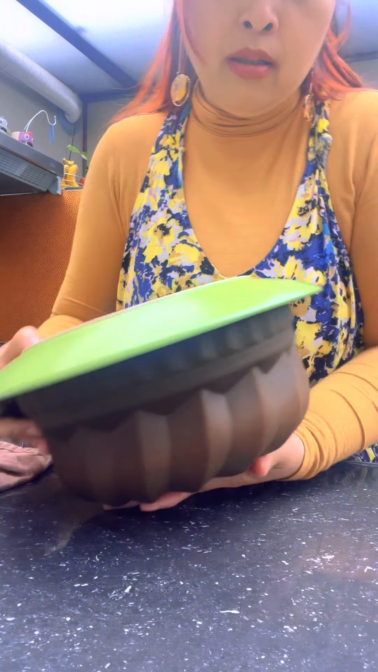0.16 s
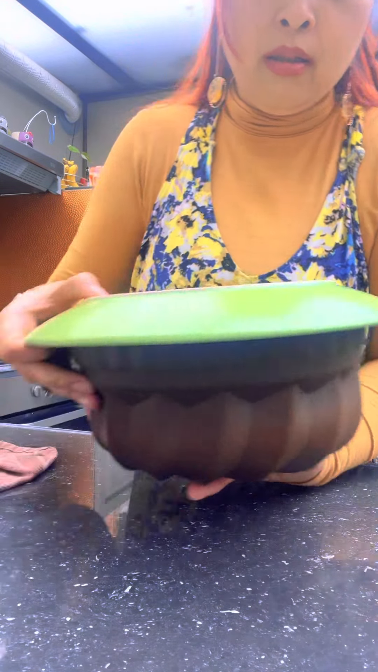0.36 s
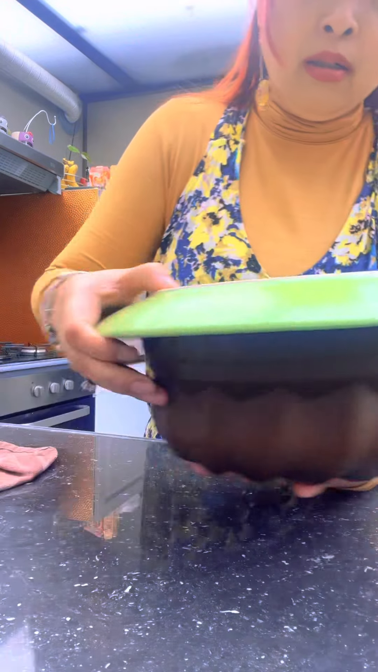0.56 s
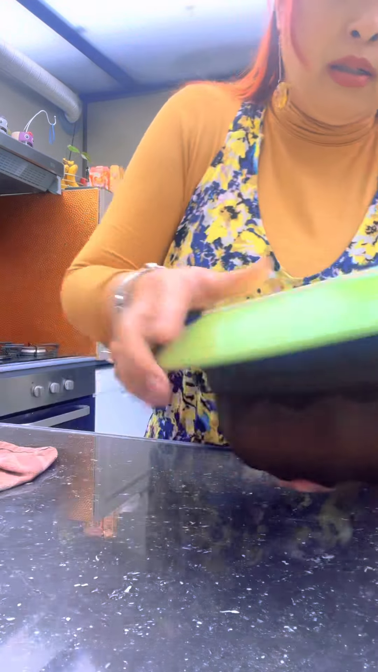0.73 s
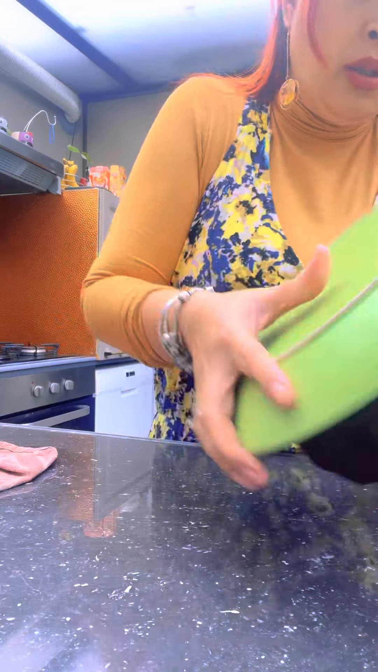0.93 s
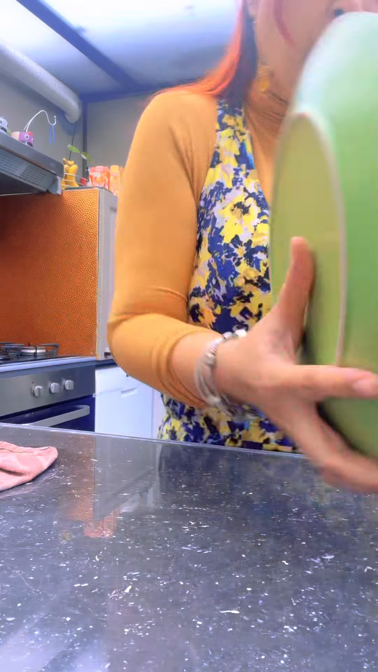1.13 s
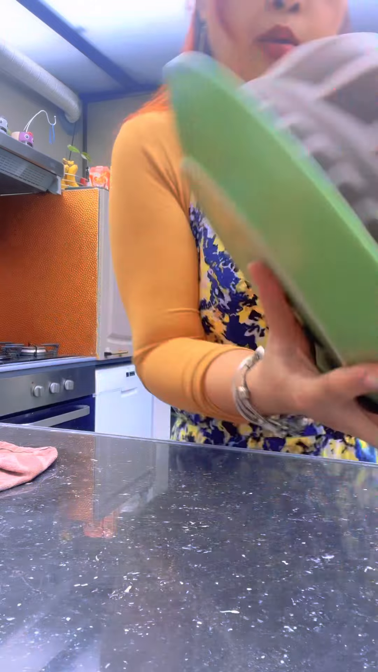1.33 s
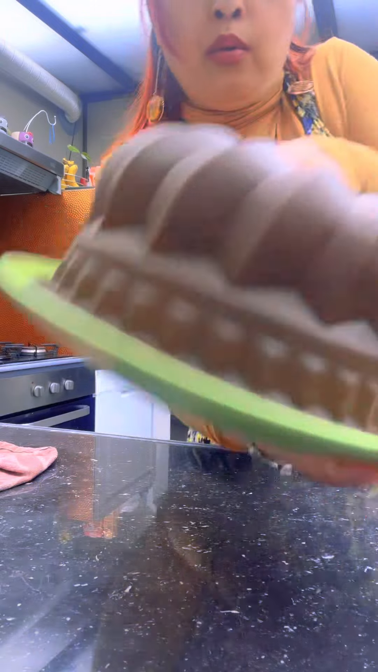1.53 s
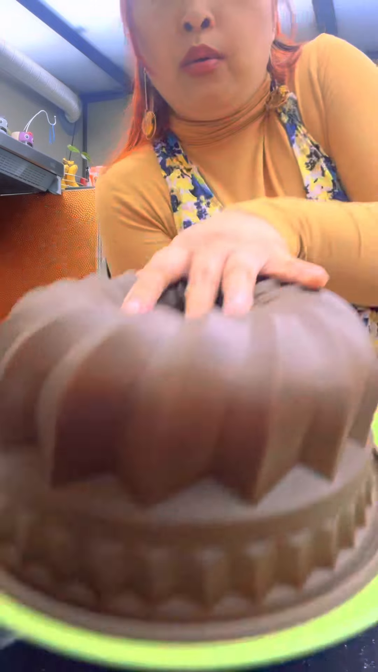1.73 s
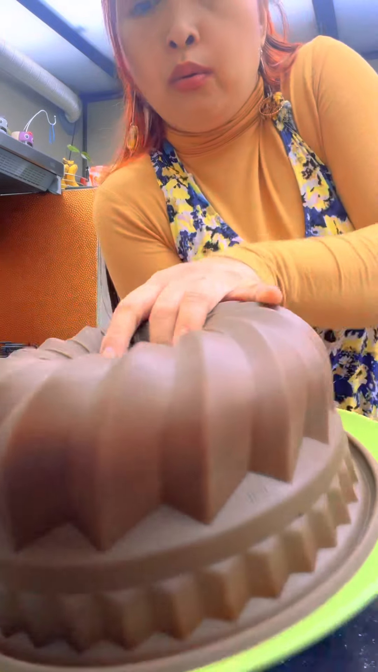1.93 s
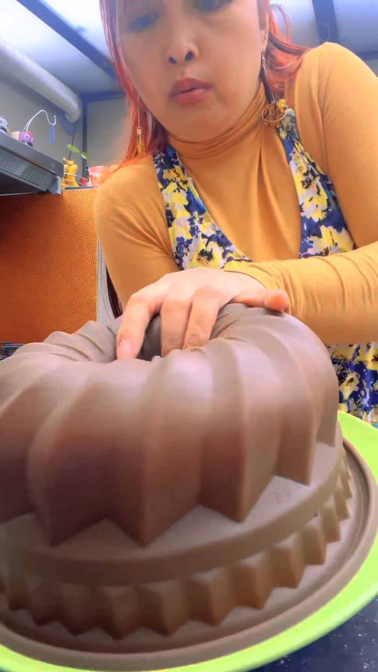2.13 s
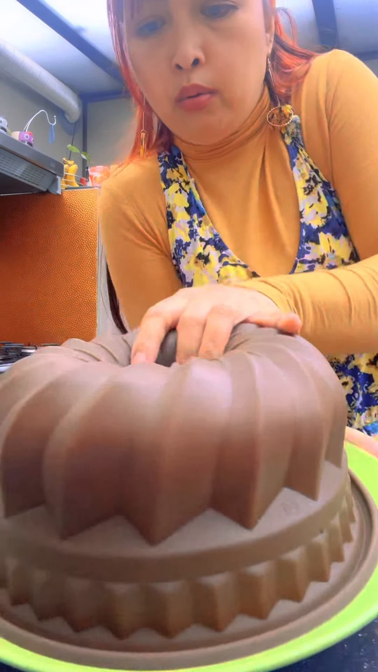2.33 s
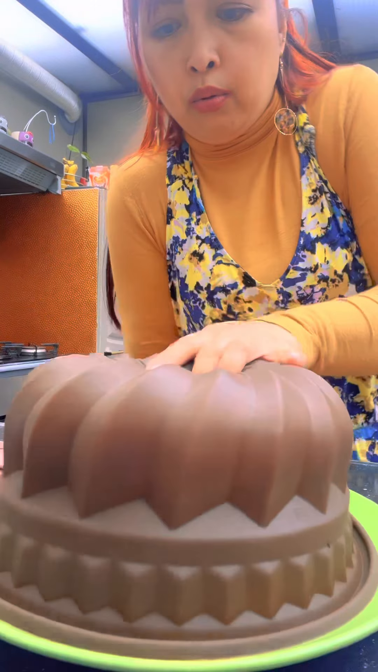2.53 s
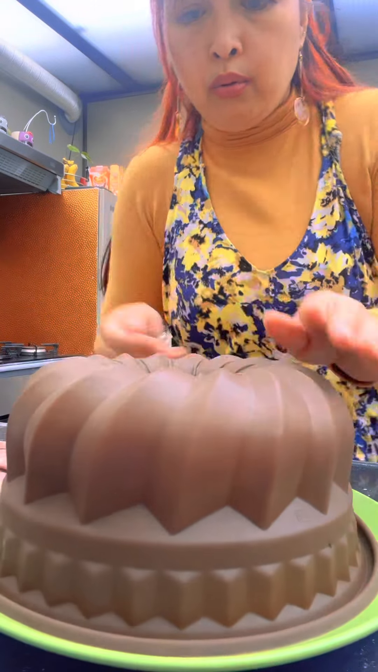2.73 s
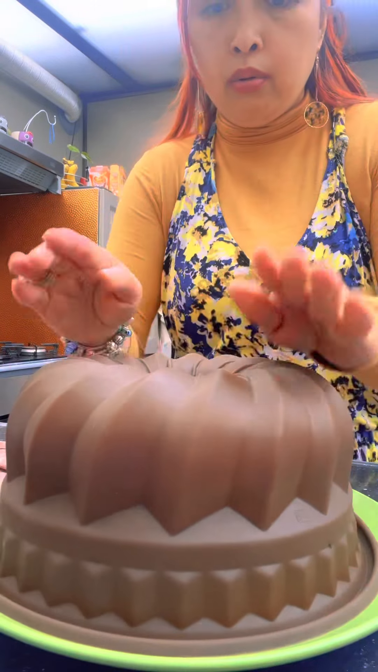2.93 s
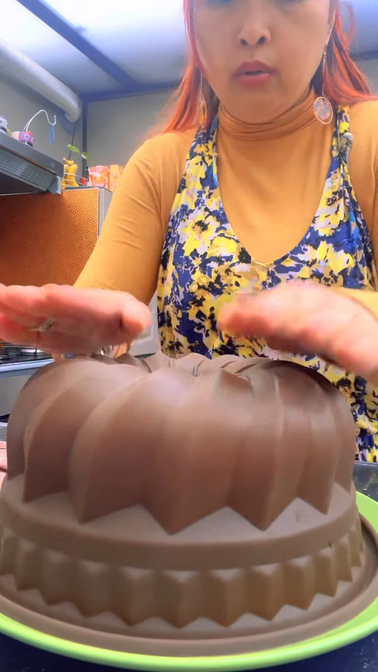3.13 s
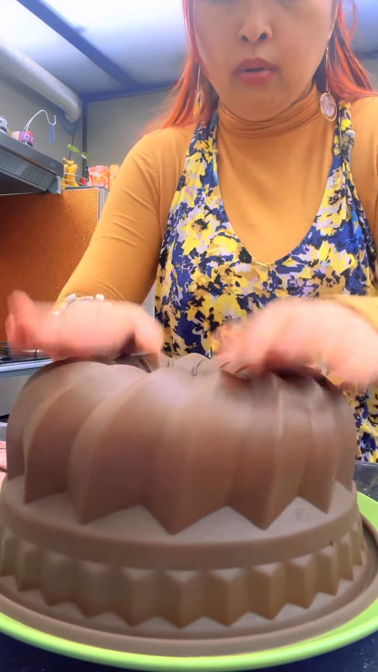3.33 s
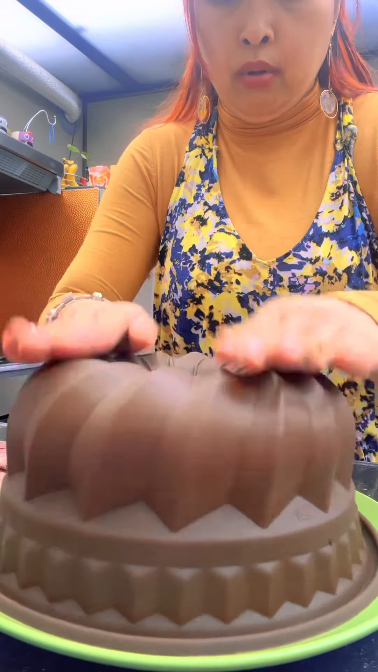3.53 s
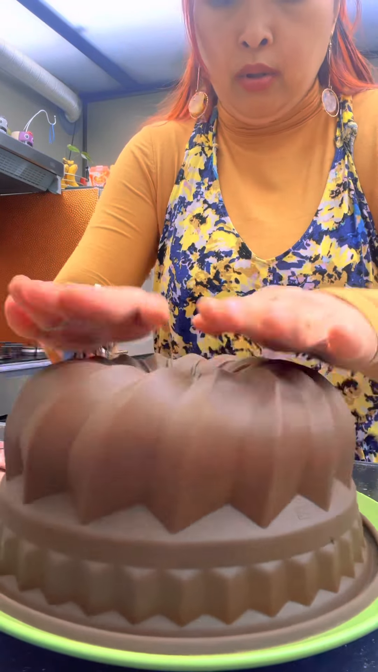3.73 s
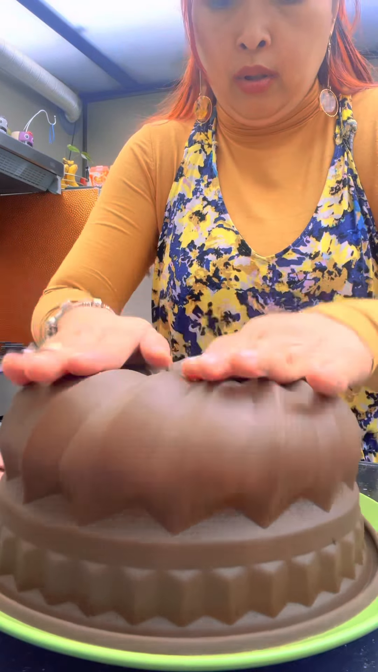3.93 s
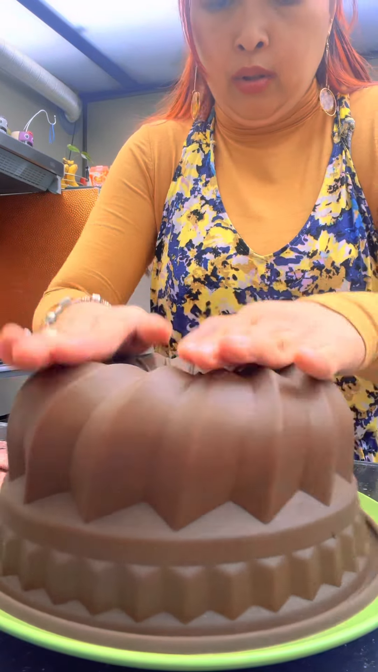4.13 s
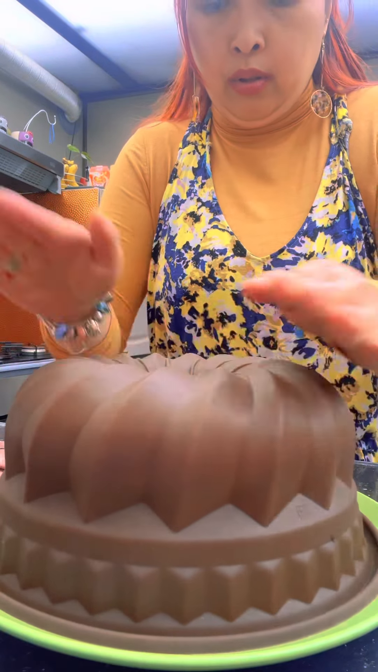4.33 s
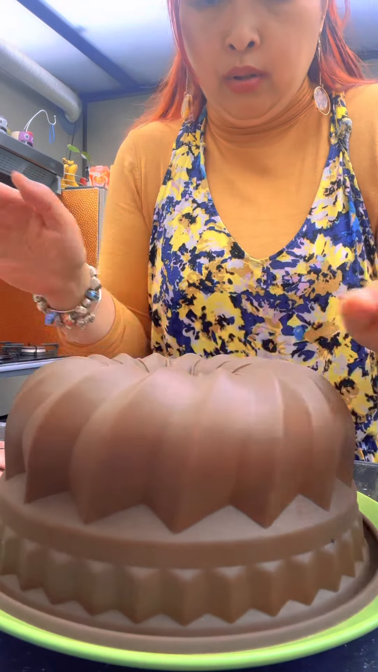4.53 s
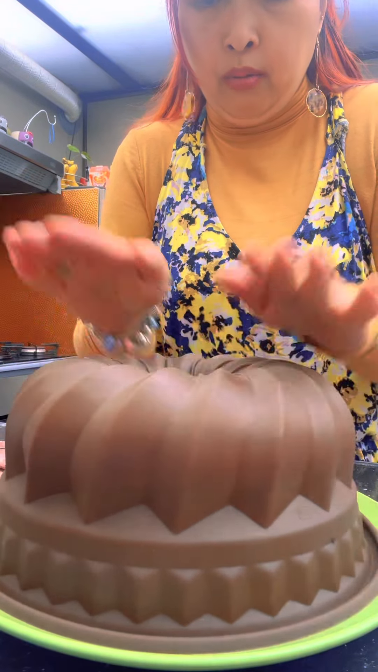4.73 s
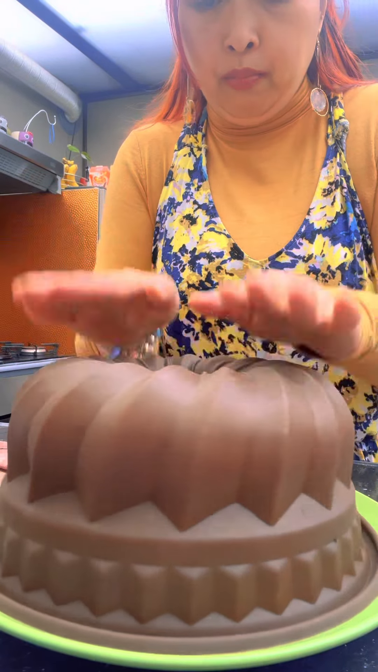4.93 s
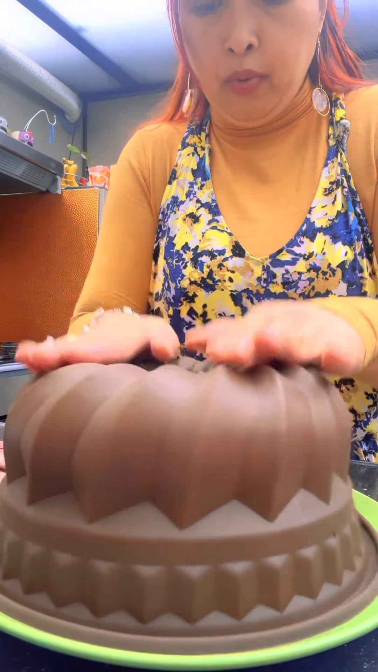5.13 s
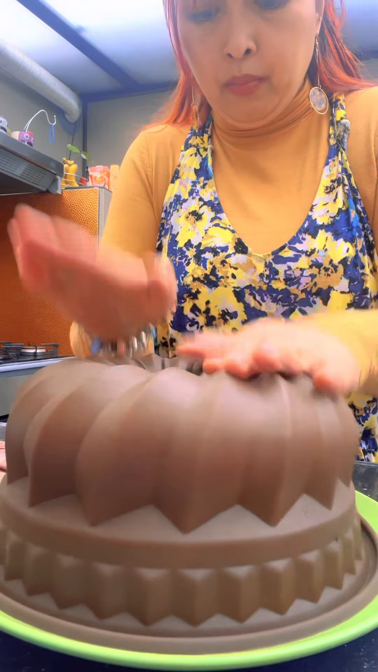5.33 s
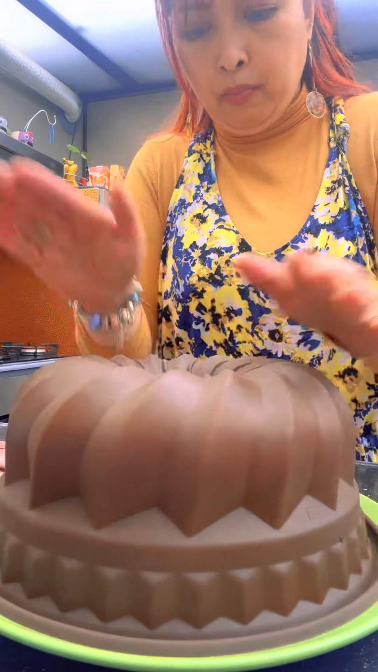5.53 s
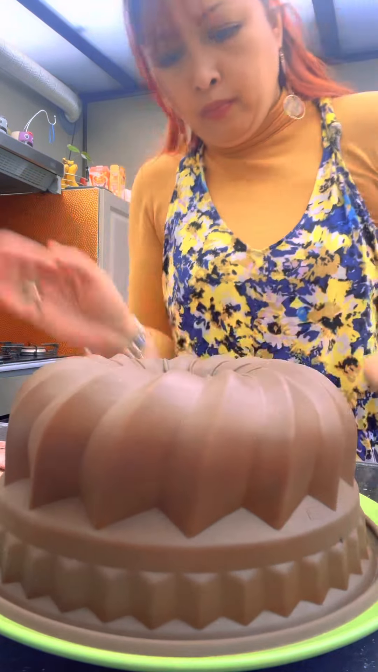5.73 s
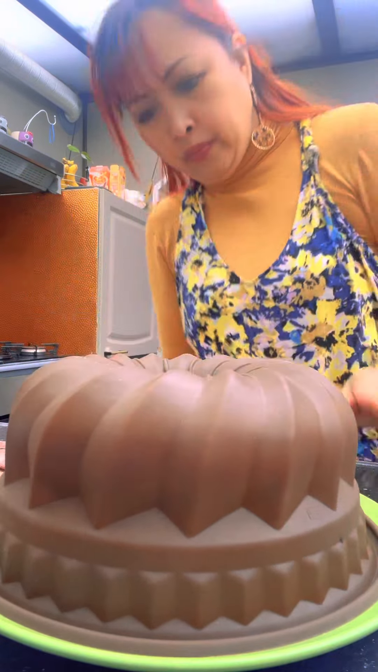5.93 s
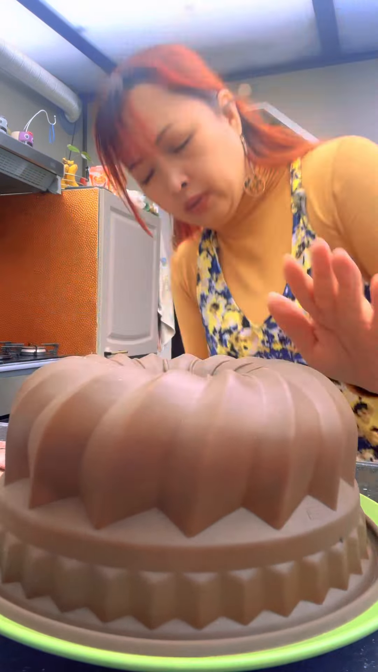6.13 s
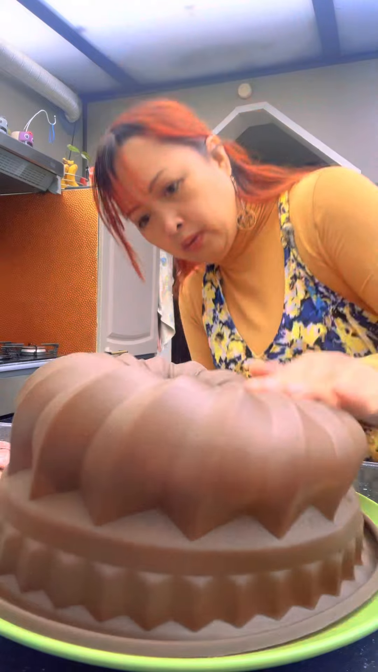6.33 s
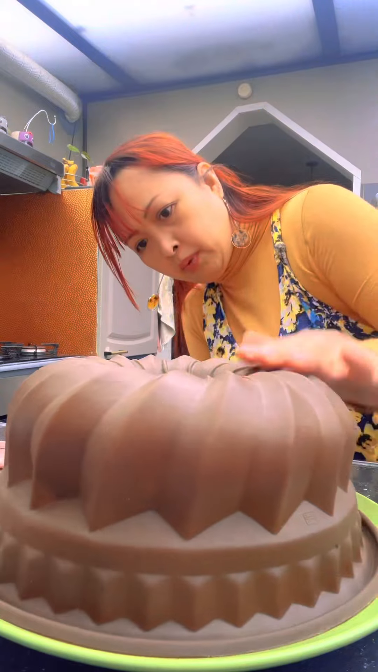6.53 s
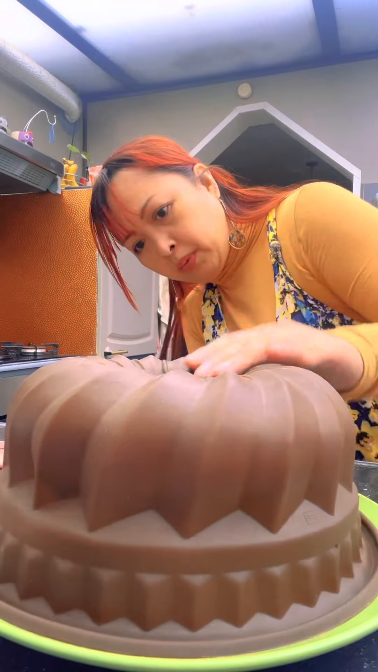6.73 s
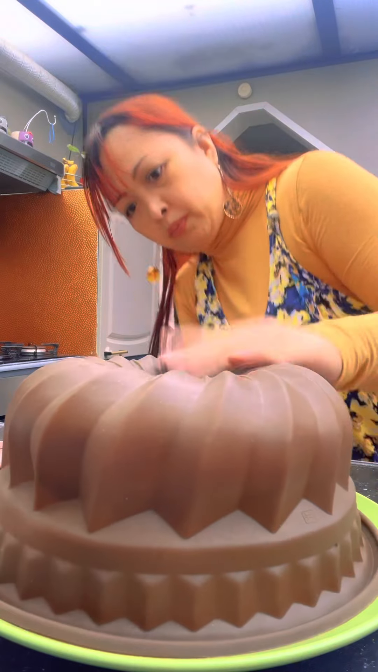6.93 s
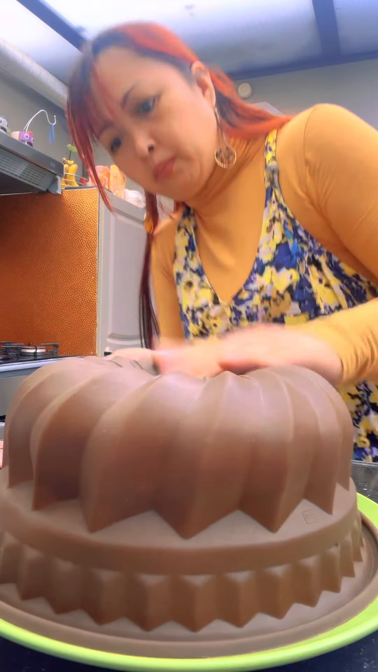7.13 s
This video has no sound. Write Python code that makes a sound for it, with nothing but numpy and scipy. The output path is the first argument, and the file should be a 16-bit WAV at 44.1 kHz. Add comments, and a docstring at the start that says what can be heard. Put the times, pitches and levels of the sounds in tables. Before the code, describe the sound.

Plate and pan bang down on stone, squeak and knock flat, followed by bursts of soft hollow hand pats with small bead ticks over a low hum.

```python
"""A cake pan on a plate is turned over onto a stone counter in a quiet kitchen, heard at two close ports.
First faint plate squeaks and bead ticks (noise grit through modes, short noise bursts); then the rim bounces
and slams (noise knocks into plate modes, falling thumps), slides squealing and juddering, and slams again.
Then palms drum on the soft pan (falling thumps, pushes into damped modes, slaps) while beads tick and rustle.
Throughout, a wavering hum (coloured noise) lies beneath and the room answers with a sparse decaying tail."""
import sys
import numpy as np
from scipy import signal
from scipy.fft import rfft, irfft, next_fast_len
from scipy.io import wavfile
from scipy.ndimage import uniform_filter1d

SR = 44100
rng = np.random.default_rng(int(sys.argv[2]) if len(sys.argv) > 2 else 0)


def to_wav(sig):
    """Store sig (one row per channel, or 1-D mono) as 16-bit WAV at the path in sys.argv[1].

    Samples outside -1..1 are clipped; the rate is SR.
    """
    pcm = np.clip(np.atleast_2d(sig), -1, 1) * 32767
    pcm = np.round(pcm).astype(np.int16)
    wavfile.write(sys.argv[1], SR, pcm.T)  # frames by channels


N = 320330  # samples
T = np.arange(N) / SR  # s
PAD = next_fast_len(N + 8192)  # transform length, samples

# Levels are drives, ahead of the filters and the mix; "rel" is relative to the first level of the row.
# rim of the plate touching the stone: [t/s, level/dB, free ring rel/dB]
RIM_BOUNCES = [(1.7636, -7.5, -6), (1.772, -25.5, -10), (1.778, -10.5, -14), (1.7865, -19.5, -10.5),
               (1.795, -17.5, -13.5), (2.305, -21.5, 12.5)]
# plate rolling down flat: [t of landing/s, level/dB, roll time/s, thump/dB, climb over the roll/dB,
# ring of plate and pan rel/dB, closing crack rel/dB, share leaning left]
PLATE_SLAMS = [(1.827, -14, .02, -12, 15.5, 1.5, -10, .9), (2.487, -15, 0.015, -4, 10, -21.5, -5.5, .2)]
# noise spectrum of a slam: [f/Hz, level per Hz/dB]
SLAM_SPECTRUM = [(60, -40), (150, -14), (450, -3), (900, -0.5), (1500, 0.5), (2400, -3.5), (3300, -13.5),
                 (4100, -10.5), (5000, -31.5), (6400, -14), (9000, -40.5), (13500, -41.5), (16400, -46)]
# plate alone: [f/Hz, width/Hz, level/dB]
PLATE_MODES = [(651, 32, 5), (1302, 34, -1), (1434, 35, -7.5), (2060, 6.8, -6), (2287, 18, -2.5),
               (3064, 30, -3), (4048, 94, -2), (5090, 17, -7), (6180, 85, -13), (13900, 180, -23.5),
               (15000, 110, -31)]
# plate and pan together: [f/Hz, width/Hz, level/dB]
LOADED_MODES = [(535, 26, 0), (712, 60, -1.5), (800, 29, -8), (907, 65, 7.5), (1120, 33, -10),
                (1310, 280, -1), (1777, 92, -0.5)]
# rim struck on stone: [f/Hz, width/Hz, level/dB]
RIM_MODES = [(1620, 260, 9.5), (1920, 220, 6.5), (3400, 260, 7), (5694, 320, 5.5), (6600, 230, 1),
             (12330, 3000, -12.5)]
# further modes of the plate in scrapes, bounces and cracks: [f/Hz, width/Hz, level/dB]
STONE_CONTACT_MODES = [(3154, 120, -7), (3590, 73, -10.5), (3800, 84, -4), (4000, 66, -2.5),
                       (4490, 56, -4.5), (5030, 130, -1.5), (6405, 250, -7)]
# thin lingering tones after a knock: [f/Hz, width/Hz, level/dB]
LINGER_MODES = [(2110, 12, -3), (3365, 12, 0), (5066, 10, -6)]
# their single swell: [t of peak/s, level/dB, rise/s, fall/s]
LINGER_ENVELOPE = (1.842, -47, .008, .2)
# plate squeaking against pan or stone: [t of peak/s, level/dB, low modes rel/dB, rise/s, fall/s]
PLATE_SQUEAKS = [(0.584, -65, 3.5, 0.34, 0.17), (0.8, -64, 1, 0.086, 0.092), (1.36, -55, 8, 0.055, 0.076),
                 (1.408, -57, 2, 0.013, 0.016), (1.547, -66, 5, 0.042, 0.11),
                 (2.241, -65.5, -0.5, 0.17, .1), (2.528, -61, 10.5, .05, 0.091)]
# plate scraping along the stone: [t/s, level/dB, low modes rel/dB]
STONE_SCRAPE = [(2.303, -40.5, 4.5), (2.307, -25, 4.5), (2.335, -32.5, -20), (2.37, -30, -30),
                (2.42, -23, -30.5), (2.432, -38, -15), (2.459, -41.5, -1.5), (2.47, -40, 21)]
# thin tones while fingers creep over the plate: [f/Hz, width/Hz, level/dB]
CREEP_MODES = [(1180, 26, -2), (1817, 26, -6.5), (2360, 20, -6)]
# strength of the creeping: [t/s, level/dB]
CREEP_LEVEL = [(0.502, -71), (.62, -72), (1.12, -64.5), (1.22, -70)]
# rim squealing while it scrapes: [t/s, level/dB, centre f/Hz]
RIM_SQUEAL = [(2.307, -28.5, 3920), (2.333, -19, 3850), (2.35, -25.5, 3780), (2.418, -22, 4140),
              (2.432, -43.5, 3670)]
# low hum while the plate judders along: [t/s, f/Hz, level/dB]
PLATE_JUDDER = [(2.273, 167, -42), (2.284, 180, -39.5), (2.312, 241, -41), (2.323, 211, -37),
                (2.402, 184.6, -41), (2.471, 185, -38)]
# short ringing notes amid the knocks and pats, one row a note: [t/s, level/dB, f/Hz, t60/s]
RINGING_NOTES = [(3.403, -16.5, 1270, 0.018), (2.305, -19, 5100, 0.051), (2.305, -23.5, 6210, 0.043),
                 (3.853, -32, 1284, 0.03), (3.866, -26.5, 1310, 0.029), (3.921, -36, 2170, 0.11),
                 (3.983, -34.5, 5090, 0.064), (4.083, -33, 3723, 0.034), (4.813, -22, 548.5, 0.21),
                 (4.872, -33.5, 695, 0.12), (5.089, -28, 612, 0.044), (5.364, -22, 2620, 0.039),
                 (6.545, -18, 702, 0.021), (6.559, -21.5, 473, 0.044), (6.733, -46, 597, 0.16),
                 (7.013, -38.5, 485, 0.3)]
# palms and fingers landing on the pan: [t/s, level/dB, settled f/Hz, slap rel/dB, lean to the left/dB]
HAND_PATS = [(0.57, -37.5, 290, -28, 14), (2.175, -36, 240, -7, 12), (2.273, -37, 386.4, -20.5, 0),
             (2.549, -26.5, 225.6, -5, 8), (2.678, -46, 184, -1, 5), (2.798, -42, 226, -5.5, 16),
             (2.853, -49.5, 177.3, -22, -4), (2.913, -44, 237, -5, 16.5), (3.01, -34.5, 166, -23.5, -5),
             (3.035, -25.5, 199.6, -17.5, 15), (3.061, -29.5, 117, -12, 16), (3.118, -35.5, 161, -14, -13),
             (3.19, -30.5, 113.2, -15, 5), (3.24, -33.5, 233, -13.5, 7), (3.332, -25.5, 156, -22, 4),
             (3.358, -26.5, 211, -20, -9), (3.399, -22.5, 106, -6, 9), (3.473, -20.5, 207, -22.5, -5),
             (3.527, -25.5, 136, -22, 5), (3.548, -27.5, 200, -9, -3), (3.612, -22.5, 161.5, -23, -7),
             (3.667, -27.5, 188, -12, -2), (3.774, -24.5, 122, -36, -12), (3.838, -25, 298, -13, 2),
             (3.853, -21, 187, -10, 17), (3.924, -19, 161, -19, 4), (3.955, -25, 172, -21, 2),
             (3.983, -17.5, 280, -9.5, 5), (4.059, -18.5, 158, -16.5, -6), (4.102, -14, 250.5, -40, -9),
             (4.141, -20.5, 243, -15.5, -6), (4.789, -21, 430, -6.5, 0), (4.795, -10, 192, -20, -9.5),
             (4.814, -17, 251, -26, -6), (4.838, -26, 109, -14, -1), (4.861, -12.5, 208, -15.5, 7),
             (4.925, -25.5, 170, -31, -4), (4.981, -26.5, 196, -2, 21), (5.04, -30.5, 158, -24, 20),
             (5.086, -15.5, 194, -21, -3), (5.121, -18, 143, -21, -3.0), (5.153, -19, 187, -22, 4),
             (5.197, -23.5, 218.3, -18, -3), (5.218, -34, 272, -6, 1), (5.293, -24, 309, -7.5, 19),
             (5.321, -19.5, 274, -8.5, -3), (5.356, -14, 177, -16, -5), (5.412, -18.5, 185, -14, -5),
             (5.443, -22, 149, -2.5, 24), (5.486, -22, 152, -4.5, 9), (5.542, -30, 225, -29.5, 6),
             (5.921, -27, 263, -11, 18), (6.245, -16.5, 192, -9.5, -3), (6.275, -21, 151, -14, -6),
             (6.341, -23.5, 226, -6, 0), (6.36, -15.5, 211.5, -9.5, 15), (6.38, -12.5, 270, -10.5, 1),
             (6.41, -26, 230, -42, -21), (6.484, -25, 170.5, -10, 5.5), (6.543, -18, 419, -12, -2),
             (6.686, -22, 177.7, -13, 15), (6.718, -32, 104, -25.5, -12), (6.784, -23, 236.6, -3.5, 6),
             (6.848, -31, 188.7, -35.5, 4), (6.894, -27, 230, -6, 20), (6.949, -22.5, 222, -13.5, 1),
             (6.961, -23.5, 209, -11.5, 1.5), (7.012, -29.5, 248, -39, -12), (7.046, -22, 161, -1.5, 13),
             (7.109, -31, 142, -17, 6), (7.152, -17.5, 189.3, -14.5, 6), (7.182, -35, 117, -12, 6),
             (7.254, -22.5, 360, 1.5, 13)]
# skin slapping the pan: [f/Hz, level per Hz/dB]
SLAP_SPECTRUM = [(150, -6), (400, 3), (700, -7.5), (1200, -6), (1800, -13), (2150, -21.5), (2500, -39),
                 (4000, -23), (8000, -65)]
# soft pan: [f/Hz, width/Hz, level/dB]
PAN_MODES = [(108.5, 6.5, -0.5), (136, 5.9, -9.5), (190, 16, -6), (222, 73, 2.5), (240.9, 38, -1.5),
             (311.3, 160, 0), (449, 190, -8), (604, 10, 0.5), (659, 45, -1)]
# pan wobble after each pat: [level re pat/dB, rise/s, fall/s]
PAT_WOBBLE = (-15, 0.0027, 0.13)
# counter shake after each pat: [level re pat/dB, rise/s, fall/s]
PAT_SHAKE = (-19.5, 0.0085, 0.1)
# pan creak after each pat: [level re pat/dB, rise/s, fall/s]
PAT_CREAK = (-25, 0.016, 0.06)
# pan steadied by hand after the landing: [t/s, wobble/dB, counter shake rel/dB, creak rel/dB]
HAND_STEADYING = [(1.83, -59.5, 21, 39), (1.86, -44.5, 6.5, 18), (1.95, -54.5, -7.5, 9.5),
                  (2.05, -56, -17, 11.5), (2.1, -53, -16.5, 19), (2.15, -58.5, -5.5, 18),
                  (2.24, -58, -5.5, 3.5), (2.28, -60, -1.5, 22), (2.43, -56.5, -17, -0.5),
                  (2.5, -57, 4.5, 20.5), (2.56, -54.5, -3, 19.5), (2.75, -85, -23, -7),
                  (2.96, -74, -17, -23.5)]
# how far the pats reach into the counter: [t/s, level/dB]
COUNTER_REACH = [(3, 10), (4.3, 10.5), (4.8, 3.5), (5.5, 7.5), (6.2, 4), (7.26, -6.5)]
# beads knocking together: [t/s, level/dB, brightness rel/dB, ring f/Hz]
BEAD_TICKS = [(0.862, -51.5, 14.5, 5820), (0.88, -55, 12, 5800), (1.19, -54, -6, 3070),
              (1.482, -49, -11.5, 5530), (1.619, -55, 4, 7000), (1.684, -47.5, -19, 4200),
              (2.017, -48, -30.5, 6060), (3.007, -49.5, -8, 5010), (3.0338, -48.5, -10, 3290),
              (3.1826, -42.5, -7, 5950), (3.238, -48.5, -17.5, 3380), (3.3046, -48, -15, 3860),
              (3.332, -41.5, -11, 5400), (3.385, -41, -17, 3460), (3.402, -32, -44, 2450),
              (3.473, -43.5, -3.5, 1904), (3.612, -42.5, -4.5, 5850), (3.714, -51.5, 7.5, 5960),
              (3.7743, -42, -9, 6300), (3.798, -46.5, -6.5, 4950), (3.8384, -42.5, -27, 2010),
              (3.916, -33.5, -22, 2200), (3.931, -33.5, -12, 2230), (3.9574, -42, 1, 3900),
              (3.981, -25.5, -13, 3865), (4.06, -35, -28, 3930), (4.08, -30.5, -14, 2505),
              (4.3878, -57, 1.5, 5250), (4.4704, -54.5, 11, 6300), (4.783, -35.5, -6, 5540),
              (4.801, -29.5, -21, 4170), (4.8279, -26.5, -37, 4140), (4.91, -40.5, -1.5, 3770),
              (5.041, -47.5, 6.5, 3020), (5.083, -39, -6, 4360), (5.123, -36, -7.5, 2204),
              (5.263, -42, 4, 6060), (5.276, -56.5, 20, 6300), (5.3157, -38.5, -1.5, 3900),
              (5.357, -24, -20, 3800), (5.385, -36, 4, 1860), (5.6137, -37.5, -12, 4780),
              (5.709, -53, 15.5, 7000), (5.734, -50, 11, 6630), (6.2483, -32, -6.5, 2687),
              (6.285, -38, -34, 2180), (6.6837, -38, -7.5, 4780), (6.949, -38.5, -9.5, 3890),
              (6.997, -44, -40, 3140), (7.154, -33, -17, 5270), (7.179, -36.5, -22, 3530)]
# beads and skin brushing: [t of peak/s, level/dB, brightness rel/dB, rise/s, fall/s]
BEAD_BRUSHES = [(0.67, -70, 6.5, 0.34, 0.64), (0.89, -68.5, 22.5, 0.2, 0.14),
                (1.028, -57.5, -13, 0.64, 0.61), (1.62, -76.5, 15.5, 0.46, 0.096),
                (1.776, -31, -8, 0.024, 0.11), (2.04, -49, -39, 0.23, 1), (2.3, -59.5, 17, 0.25, 0.21),
                (2.507, -39.5, -6.5, 0.099, 0.11), (2.79, -79.5, 25.5, 0.16, 0.059),
                (3.068, -57, 2.5, 0.055, 0.21), (3.449, -58, -7, 0.25, 1), (3.981, -43, -4, 0.11, 0.14),
                (4.12, -50, 4, 0.16, 0.061), (4.518, -77.5, 23, 0.15, 0.072), (4.8, -71.5, 18, 0.1, 0.24),
                (5.15, -52, -5, 0.19, 0.17), (5.36, -43, -2.5, 0.081, 0.27), (5.721, -54, 5.5, 0.044, 0.32),
                (5.949, -50, -14, 0.075, 0.16), (6.248, -40, -24.5, 0.012, 0.076),
                (6.702, -54.5, -9, 0.014, 0.096), (7.0, -54.5, -9.5, 0.14, 0.051)]
# beads settling after each pat: [level re pat/dB, rise/s, fall/s]
PAT_CRACKLE = (-45, .01, .07)
# body of the bead noise: [f/Hz, level per Hz/dB]
DULL_SPECTRUM = [(900, 7.5), (2000, 1.5), (3500, -3), (6000, -7.5), (8000, -15), (11000, -26)]
# top of the bead noise: [f/Hz, level per Hz/dB]
BRIGHT_SPECTRUM = [(4000, -24), (7000, -3.5), (9500, -10), (12500, -8), (15000, -7.5), (16400, -25.5)]
# decay of the room: [f/Hz, t60/s]
ROOM_DECAY = [(60, 0.78), (260, 0.48), (700, 0.043), (1840, 0.41), (5000, 0.39), (13000, 0.22)]
# steady background: [f/Hz, level per Hz/dB]
HUM_SPECTRUM = [(12, -47), (20, -14.5), (102, -3.5), (340, -12.5), (370, -14), (414, -7), (451, -19.5),
                (549, -14.5), (1240, -30), (13800, -61.5), (16400, -52.5)]
# its wavering: [t/s, level/dB]
HUM_LEVEL = [(0, -53), (1.7, -53), (2.8, -61.5), (4.5, -59), (5.7, -52), (6.2, -54.5), (7.26, -49)]
# port difference over port sum: [f/Hz, level/dB]
PORT_DIFFERENCE = [(60, -37.5), (140, -20.5), (330, -15), (770, -6.5), (1170, -3), (1900, 4), (2500, 3.5),
                   (3100, -0.5), (4190, -4), (6400, -2), (7600, 7.5), (8800, 20), (10000, 12.5),
                   (11500, -2.5), (13000, -11), (16000, -19.5)]
# left port over right port: [f/Hz, level/dB]
PORT_LEAN = [(300, 0), (700, -5), (2400, -5), (4400, 0), (8000, 0)]

SQUEAL_WIDTH_HZ, SQUEAL_THROB_HZ = 206.6, 91.6
SQUEAL_WANDER = 0.019  # rms share of its pitch
SWELL_DB = 20  # a swell climbs about this much in its rise time and loses it in its fall time
EDGE_HZ = 16500  # upper band limit


def gain_of(db):
    """Decibel law: amplitude ratio of a level."""
    return 10 ** (np.asarray(db) / 20)


def evened(x):
    """Normalisation: scales a signal to unit rms."""
    return x / np.sqrt(np.mean(x ** 2) + 1e-20)


def smoothed(x, first, second):
    """Low-pass filtering by two running means, lengths in samples."""
    return uniform_filter1d(uniform_filter1d(x, first), second)


def read(points, hz):
    """Interpolation of a spectrum on a logarithmic frequency scale."""
    f, value = np.transpose(points)
    return np.interp(np.log(hz + 1), np.log(f + 1), value)


def add(mix, s, sound):
    """Superposition: adds a sound into the mix from time s, in place."""
    part = mix[round(s * SR):][:len(sound)]
    part += sound[:len(part)]


def coloured(x, points):
    """Minimum-phase filtering: a spectrum in dB with the causal phase its log gain implies."""
    hz = abs(np.fft.fftfreq(8192, 1 / SR))
    log_gain = np.log(gain_of(np.maximum(read(points, hz), -100)))
    phase = -signal.hilbert(log_gain).imag
    taps = np.fft.ifft(np.exp(log_gain + 1j * phase)).real[:4096]
    return signal.oaconvolve(x, taps / np.linalg.norm(taps))[:len(x)]


def rung(x, modes):
    """Modal resonance: the response is a sum of damped sines, each decaying at pi times its width."""
    t = np.arange(6000) / SR
    taps = np.zeros(len(t))
    for hz, width, db in modes:
        taps += gain_of(db) * width * np.exp(-np.pi * width * t) * np.sin(2 * np.pi * hz * t)
    return signal.oaconvolve(x, taps / np.linalg.norm(taps))[:len(x)]


def level(tables, column=1):
    """Envelope: gain over time from dB tables, silent outside them; later columns add to the first level."""
    out = np.zeros(N)
    for rows in map(np.array, tables):
        s = T[round(rows[0, 0] * SR):round(rows[-1, 0] * SR)]
        db = rows[:, 1] + (column > 1) * rows[:, column]
        add(out, rows[0, 0], gain_of(np.interp(s, rows[:, 0], db)))
    return uniform_filter1d(out, 200)


def swells(s, peak_db, rise_s, fall_s):
    """Incoherent addition: overlapping swells, straight in dB, whose powers add."""
    step = T[::64, None] - np.atleast_1d(s)
    share = np.where(step < 0, -step / (rise_s + 0.0011), step / (fall_s + 1e-3))
    power = (gain_of(peak_db - SWELL_DB * share) ** 2).sum(1)
    return np.interp(T, T[::64], np.sqrt(power))


def after_pats(db, rise_s, fall_s):
    """Proportional response: one swell starting at every pat and scaled with it."""
    s, pat_db = np.transpose(HAND_PATS)[:2]
    return swells(s + rise_s, pat_db + db, rise_s, fall_s)


def grit(per_s, spread_db):
    """Shot noise: random clicks of uneven size."""
    size = gain_of(spread_db * np.minimum(rng.exponential(1, N), 4)) * rng.standard_normal(N)
    return evened(size * (rng.random(N) < per_s / SR))


def clumps(depth_db):
    """Random modulation: gain swelling over about a fortieth of a second."""
    return gain_of(depth_db * evened(smoothed(rng.standard_normal(N), 900, 500)))


def falling(hz, t60, glide, glide_s):
    """Contact stiffness: a thump whose pitch drops to hz as the contact widens."""
    t = np.arange(5000) / SR
    turns = np.cumsum(hz * (1 + glide * np.exp(-t / glide_s))) / SR
    return np.sin(2 * np.pi * turns) * (1 - np.exp(-t / 0.0037)) * gain_of(-60 * t / t60)


def spread(x, lag_s):
    """Dispersion: the treble of a hit comes first and its bass a little later.

    The lag falls as one over root frequency: lag_s at 100 Hz, none at 2.5 kHz."""
    hz = np.fft.rfftfreq(PAD, 1 / SR)
    turns = 1.25 * lag_s * (20 * np.sqrt(hz) - hz / 5)
    return irfft(rfft(x, PAD) * np.exp(-2j * np.pi * turns), PAD)[:N]


def bounces():
    """Impact excitation: brief noise knocks of the rim, and the part that rings the plate freely."""
    knocks, free = np.zeros((2, N))
    t = np.arange(400) / SR
    noises = rng.standard_normal((len(RIM_BOUNCES), 400))
    for (s, db, free_db), noise in zip(RIM_BOUNCES, noises):
        knock = gain_of(db) * noise * np.exp(-t / 0.0016) * (1 - np.exp(-t / 0.0009))
        add(knocks, s, knock)
        add(free, s, gain_of(free_db) * knock)
    return knocks, free


def slams():
    """Rolling contact: noise swells until the rim lies flat, as trapped air thumps and the rim cracks shut."""
    roll, lean, thumps, cracks = np.zeros((4, N))
    t = np.arange(-2200, 400) / SR  # zero at the landing
    noises = rng.standard_normal((len(PLATE_SLAMS), len(t)))
    for row, noise in zip(PLATE_SLAMS, noises):
        s, db, roll_s, thump_db, climb_db, ring_db, crack_db, left = row
        before = np.minimum(t, 0) / roll_s
        # after landing the sound is cut off at 5200 dB/s
        swell = gain_of(climb_db * before - 5200 * np.maximum(t, 0)) * (t > -roll_s)
        # the noise body climbs 15 dB more than the ring
        body = gain_of(8.5 + 15 * before) * coloured(noise, SLAM_SPECTRUM)
        body += gain_of(ring_db) * rung(noise, LOADED_MODES)
        add(roll, s + t[0], gain_of(db) * swell * body)
        add(lean, s + t[0], left * gain_of(db + ring_db) * swell * rung(noise, LOADED_MODES[:4]))
        add(cracks, s - .002, gain_of(db + crack_db) * noise[:90])
        thump = falling(158.9, 0.044, 2.2, 0.0048) + gain_of(-9.0) * falling(30, 0.053, 3.2, 0.048)
        add(thumps, s - .003, gain_of(thump_db) * thump)
    return spread(roll, .003), spread(lean, 0.0024), thumps, cracks


def sliding(low, high, rub):
    """Friction excitation: grit drives low and high plate modes in squeaks, scrapes and creeping."""
    s, db, low_db, rise_s, fall_s = np.transpose(PLATE_SQUEAKS)
    scrape_high = rung(level([STONE_SCRAPE]) * rub, high + STONE_CONTACT_MODES)
    squeak_high = rung(swells(s, db, rise_s, fall_s) * rub, high)
    low_drive = level([STONE_SCRAPE], column=2) + swells(s, db + low_db, rise_s, fall_s)
    creep = rung(level([CREEP_LEVEL]) * rub, CREEP_MODES)
    return scrape_high + squeak_high + rung(low_drive * rub, low) + creep


def plate():
    """Forced vibration: knocks, slams and friction ring the plate; also returns the lean to the left."""
    knocks, free = bounces()
    roll, lean, thumps, cracks = slams()
    knocks += cracks
    free += gain_of(-5.5) * cracks
    low = [m for m in PLATE_MODES if m[0] < 2500]
    high = [m for m in PLATE_MODES if m[0] >= 2500]
    rub = grit(7000, 0.67)
    ring = rung(free, high + STONE_CONTACT_MODES)
    sharp_knocks = knocks - soft(knocks, size=26)  # treble only
    ring += gain_of(3.0) * rung(sharp_knocks, RIM_MODES)
    ring += rung(swells(*LINGER_ENVELOPE) * rub, LINGER_MODES)
    return sliding(low, high, rub) + ring + roll + thumps, lean


def squeal():
    """Stick-slip resonance: grit through one resonance, twice, whose centre wanders and level throbs."""
    s, db, hz = np.transpose(RIM_SQUEAL)
    wander = 1 + SQUEAL_WANDER * evened(smoothed(rng.standard_normal(N), 500, 500))
    turn = np.exp(2j * np.pi * np.cumsum(np.interp(T, s, hz) * wander) / SR)
    r = np.exp(-np.pi * SQUEAL_WIDTH_HZ / SR)
    # shifted to zero frequency, filtered there and shifted back
    band = signal.lfilter([1], np.convolve([1, -r], [1, -r]), grit(6900, 0.96) / turn)
    # a second band joins 480 Hz above
    upper = np.exp(2j * np.pi * 480 * T) * np.clip((T - s[0]) / .05, 0, 1)
    throb = 1 + .5 * np.cos(2 * np.pi * SQUEAL_THROB_HZ * (T - s[1] + .004))
    tone = evened((turn * band * (1 + 0.44 * upper)).real)
    return tone * throb * level([np.transpose([s, db])])


def judder():
    """Periodic stick-slip: regular slips give a fundamental and three weaker multiples."""
    s, hz, db = np.transpose(PLATE_JUDDER)
    phase = 2 * np.pi * np.cumsum(np.interp(T, s, hz)) / SR
    tone = np.cos(phase) + gain_of(-5.5) * np.cos(2 * phase)
    tone += gain_of(-24.5) * np.cos(3 * phase + .6) + gain_of(-19.5) * np.cos(4 * phase + 0.73)
    return np.sqrt(2) * tone * level([np.transpose([s, db])])


def ringing_notes():
    """Free decay: single damped notes with a soft start."""
    out, t = np.zeros(N), np.arange(4000) / SR
    for s, db, hz, t60 in RINGING_NOTES:
        note = (1 - np.exp(-t / 0.0014)) * np.sin(2 * np.pi * hz * t)
        add(out, s, gain_of(db - 60 * t / t60) * note)
    return out


def soft(x, size=24):
    """Low-pass smoothing: two equal running means pass little treble, as in a push of soft skin."""
    return smoothed(x, size, size)


def pats():
    """Soft impact: each pat gives a falling thump, a shove for the pan and a slap with its lean."""
    thumps, shoves, slaps, leaning = np.zeros((4, N))
    t = np.arange(900) / SR
    push = 1.533 * np.exp(-((t - .0018) / 0.00016) ** 2)  # the hand stopping, same shape in every pat
    noises = rng.standard_normal((len(HAND_PATS), 2, 900))
    for (s, db, hz, slap_db, lean_db), noise in zip(HAND_PATS, noises):
        add(thumps, s, gain_of(db) * falling(hz, 0.1, 0.82, 0.0023))
        add(shoves, s, gain_of(db) * (0.43 * noise[0] + push) * np.exp(-t / 0.0035))
        slap_shape = np.exp(-t / 0.0045) * (1 - np.exp(-t / 0.002)) ** 2
        slap = gain_of(db + slap_db) * (1.17 * noise[1] + push) * slap_shape
        add(slaps, s, slap)
        add(leaning, s, slap * np.tanh(lean_db / 17))
    return thumps, shoves, slaps, leaning


def pan_wobble():
    """Sustained modal excitation: grit keeps the pan's modes moving after a touch."""
    return rung((level([HAND_STEADYING]) + after_pats(*PAT_WOBBLE)) * grit(400, 1.0), PAN_MODES)


def counter_shake():
    """Structure-borne sound: deep noise of the counter answering the hands."""
    reach = gain_of(np.interp(T, *np.transpose(COUNTER_REACH)))
    drive = level([HAND_STEADYING], column=2) + after_pats(*PAT_SHAKE) * reach
    # [f/Hz, level per Hz/dB]
    deep = [(20, -33.0), (45, -7.0), (62, 8.0), (85, 7.0), (130, -47.5)]
    return drive * coloured(rng.standard_normal(N), deep)


def pan_creak():
    """Friction noise: clumped grit as the handled pan creaks."""
    return (level([HAND_STEADYING], column=3) + after_pats(*PAT_CREAK)) * clumps(1.0) * grit(2500, 0.83)


def hands():
    """Coupled impact: pats drive pan, plate and counter; also returns the slaps' lean to the left."""
    thumps, shoves, slaps, leaning = pats()
    slaps += gain_of(-9.5) * pan_creak()
    centre = gain_of(-6.0) * thumps + gain_of(-3.5) * soft(rung(shoves, PAN_MODES))
    centre += soft(pan_wobble()) + gain_of(-8.0) * counter_shake()
    # the hollow knock of pan and plate
    low_pass = signal.butter(6, 2050., fs=SR, output="sos")
    centre += gain_of(3.5) * signal.sosfilt(low_pass, rung(slaps, LOADED_MODES))
    lean = gain_of(0.5) * coloured(leaning, SLAP_SPECTRUM)
    return centre + coloured(slaps, SLAP_SPECTRUM), lean


def bead_ticks():
    """Micro-impacts: scuffing noise with a rough ring, two tones times slow noise; dull and bright parts."""
    dull, bright = np.zeros((2, N))
    t = np.arange(1500) / SR
    rise = 1 - np.exp(-t / 0.0013)
    noises = rng.standard_normal((len(BEAD_TICKS), 3, 1500))
    for (s, db, bright_db, hz), noise in zip(BEAD_TICKS, noises):
        tone = np.sin(2 * np.pi * hz * t) + np.sin(2 * np.pi * 1.7 * hz * t)
        ring = 0.3 * evened(uniform_filter1d(noise[2], size=110)) * tone
        tick = 0.61 * noise[0] * np.exp(-t / 0.0073) + ring * np.exp(-t / 0.011)
        add(dull, s, gain_of(db) * rise * tick)
        add(bright, s, gain_of(db + bright_db) * rise * noise[1] * np.exp(-t / 0.0041))
    return dull, bright


def beads():
    """Granular contact: ticks over a clumped rustle and crackle; brightness sets the top of the spectrum."""
    dull, bright = bead_ticks()
    uneven = clumps(1.8)
    s, db, bright_db, rise_s, fall_s = np.transpose(BEAD_BRUSHES)
    dull += gain_of(-1.5) * swells(s, db, rise_s, fall_s) * uneven * grit(7000, 0.96)
    dull += after_pats(*PAT_CRACKLE) * grit(500, 4.0)
    bright += gain_of(-10.0) * swells(s, db + bright_db, rise_s, fall_s) * uneven * grit(2600, 3.1)
    return coloured(dull, DULL_SPECTRUM) + coloured(bright, BRIGHT_SPECTRUM)


def kitchen(x):
    """Reverberation: sparse taps of random sign, each band with its own decay; one tail for each path."""
    taps = np.zeros((2, SR // 2))
    # one tap at a random place in every 20 samples
    at = np.arange(200, SR // 2 - 20, 20) + rng.integers(0, 20, (2, (SR // 2 - 201) // 20))
    np.put_along_axis(taps, at, rng.choice([-1., 1.], at.shape), 1)
    hz, t, bands = signal.stft(taps, SR, nperseg=256)
    decay = gain_of(-60 * t / read(ROOM_DECAY, hz)[:, None])
    tail = signal.istft(bands * decay, SR, nperseg=256)[1]
    return signal.fftconvolve(x[None], tail / np.linalg.norm(tail[0]), axes=1)[:, :N]


def background_hum():
    """Stationary noise: two independent coloured noises under one wavering level."""
    noises = rng.standard_normal((2, N))
    return np.array([coloured(n, HUM_SPECTRUM) for n in noises]) * level([HUM_LEVEL])


def two_ports(paths, lean):
    """Sum and difference: the ports share power between the two paths, a quarter turn apart."""
    mid, side = rfft(paths, PAD)
    hz = np.fft.rfftfreq(PAD, 1 / SR)
    angle = np.arctan(gain_of(read(PORT_DIFFERENCE, hz)))
    mid *= np.cos(angle)
    tilt = np.tanh(read(PORT_LEAN, hz) * np.log(10) / 40)
    side = 1j * side * np.sin(angle) + mid * tilt
    mid, side = irfft(mid, PAD)[:N], irfft(side, PAD)[:N] + lean
    return np.array([mid + side, mid - side])


def scene():
    """Superposition: all near sources, their room tails and the hum, as left and right ports."""
    palms, palms_lean = hands()
    rim, rim_lean = plate()
    near = rim + squeal() + judder() + ringing_notes() + spread(palms, 0.00844) + beads()
    room = gain_of([[-16], [-10]]) * kitchen(near)  # sum path, difference path
    return two_ports(near + room + background_hum(), spread(palms_lean, 0.00848) + rim_lean)


def record(dry):
    """Transduction: the microphone drops the deepest bass and rounds the highest peaks; then the band limit."""
    thin = signal.sosfilt(signal.butter(2, 40., "high", fs=SR, output="sos"), dry)
    rounded = thin / (1 + thin ** 4) ** .25
    taps = signal.firwin(511, EDGE_HZ, window=("kaiser", 9), fs=SR)
    return signal.oaconvolve(.92 * rounded, taps[None], "same")


dry = scene()
out = record(dry)
to_wav(out)
```